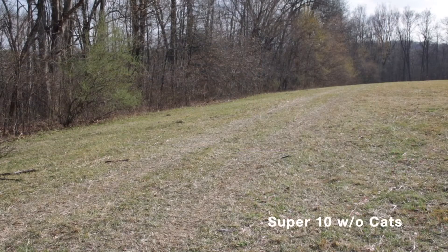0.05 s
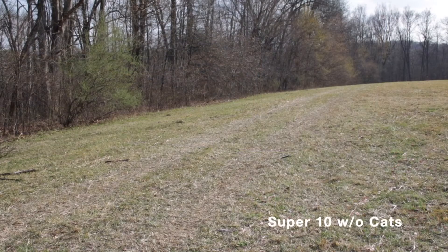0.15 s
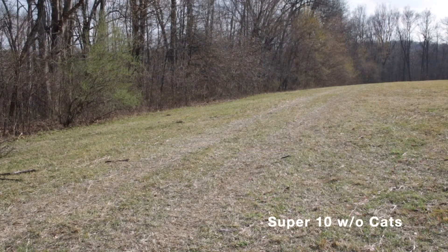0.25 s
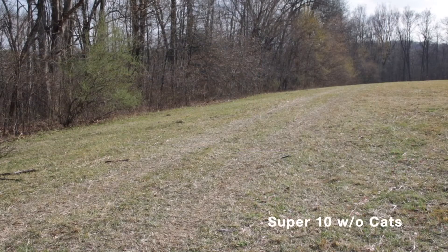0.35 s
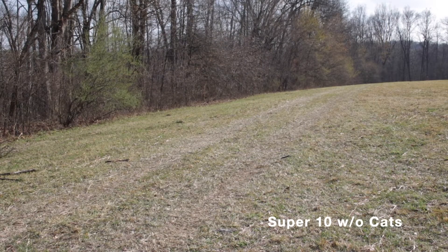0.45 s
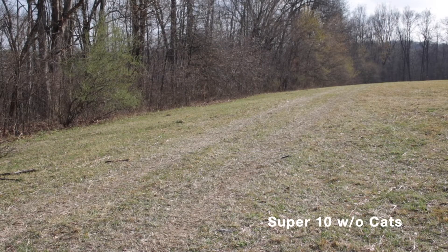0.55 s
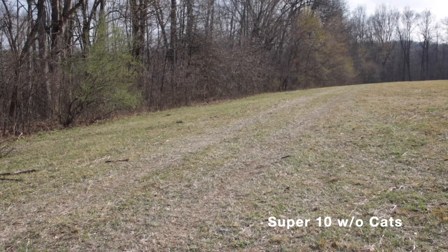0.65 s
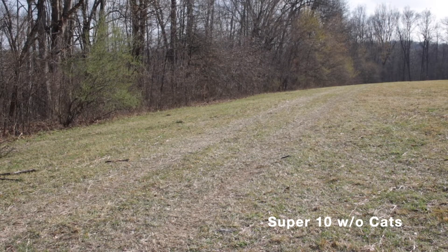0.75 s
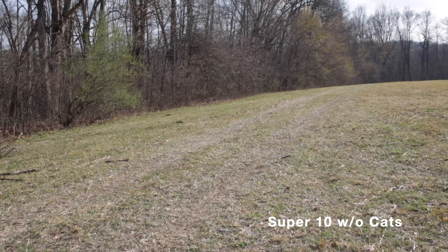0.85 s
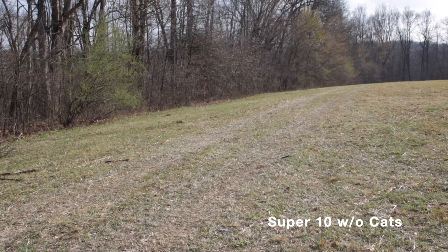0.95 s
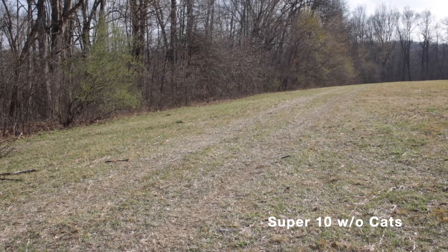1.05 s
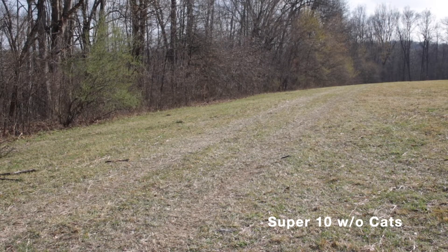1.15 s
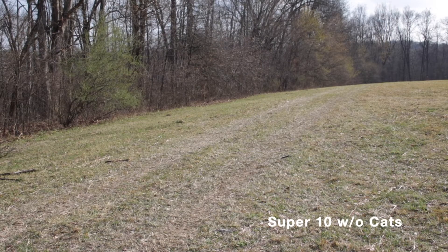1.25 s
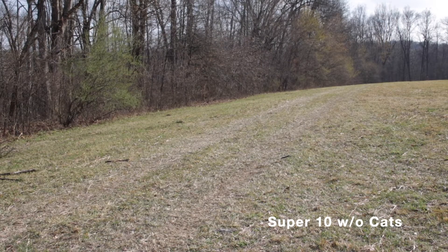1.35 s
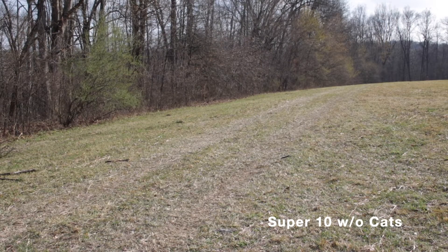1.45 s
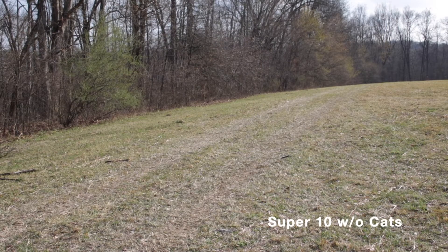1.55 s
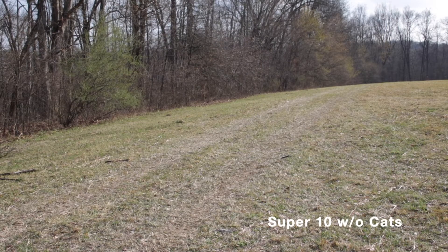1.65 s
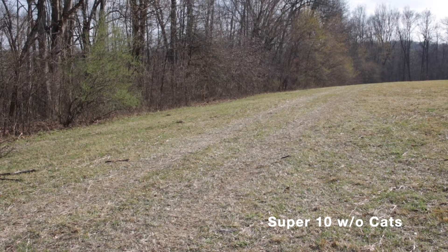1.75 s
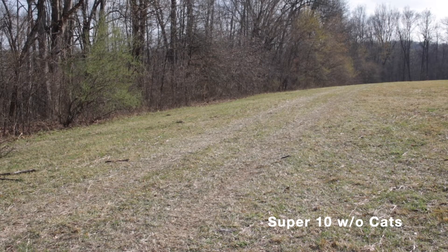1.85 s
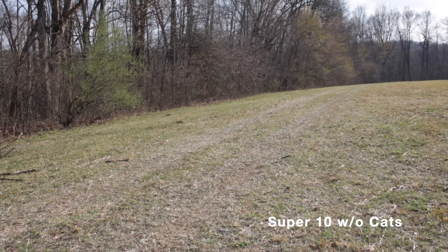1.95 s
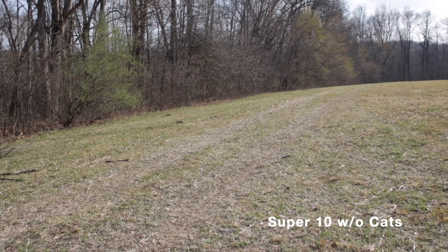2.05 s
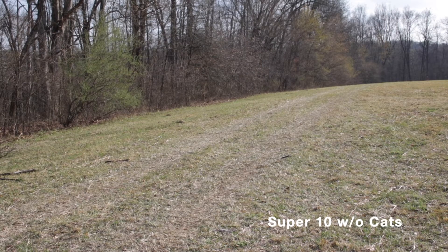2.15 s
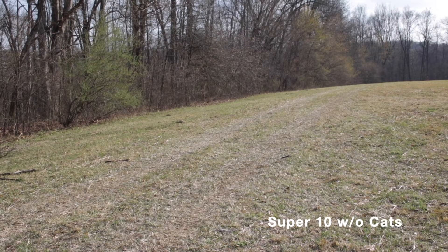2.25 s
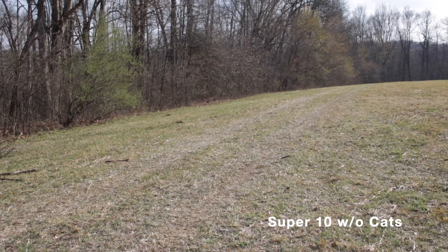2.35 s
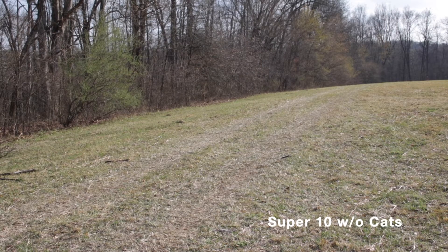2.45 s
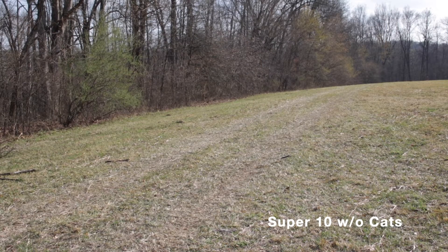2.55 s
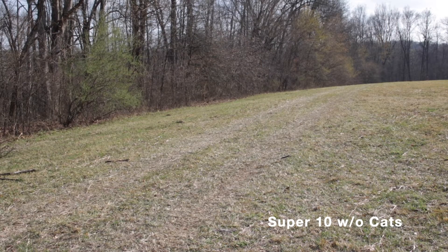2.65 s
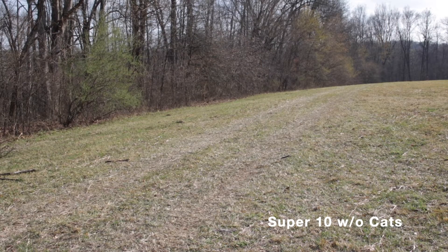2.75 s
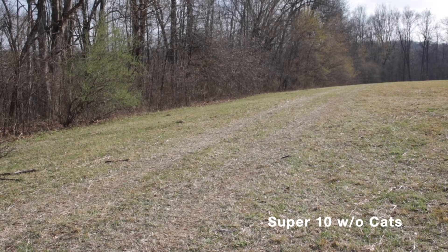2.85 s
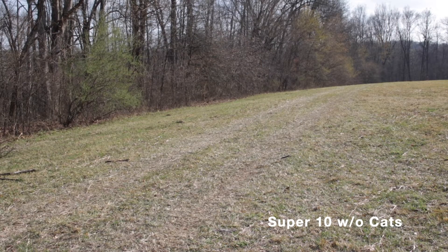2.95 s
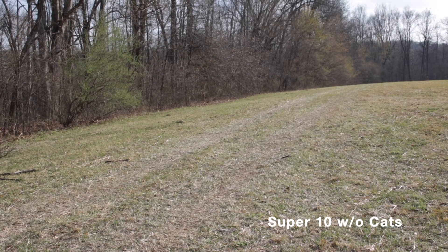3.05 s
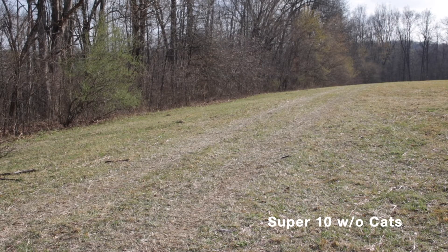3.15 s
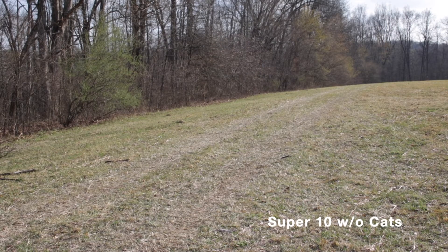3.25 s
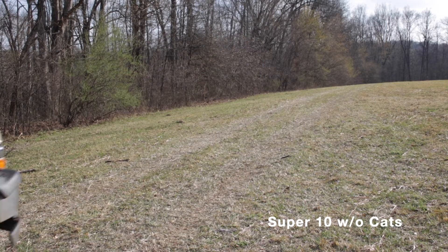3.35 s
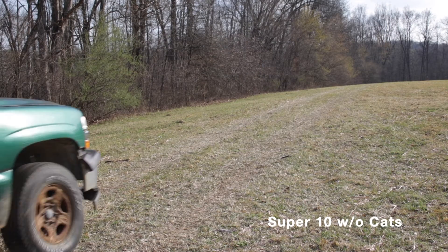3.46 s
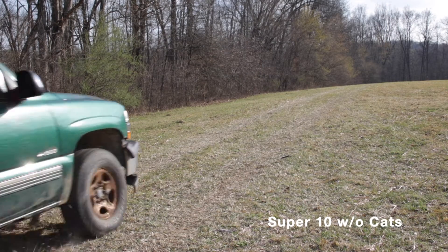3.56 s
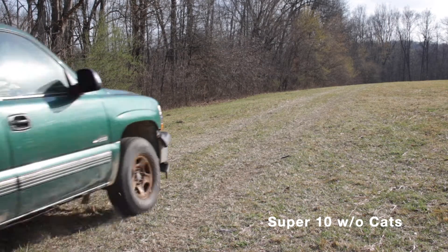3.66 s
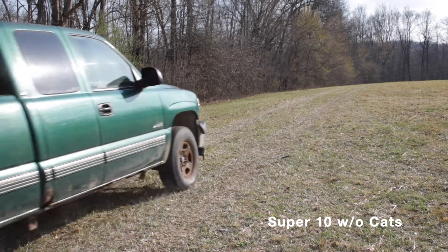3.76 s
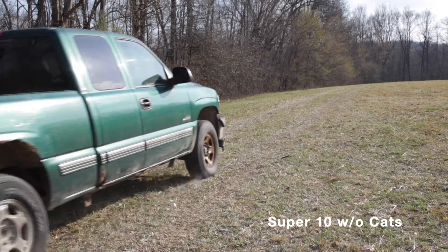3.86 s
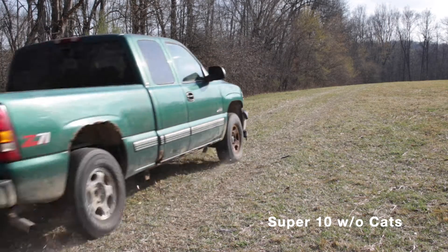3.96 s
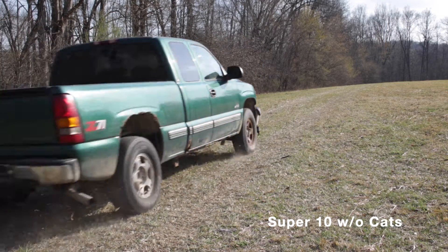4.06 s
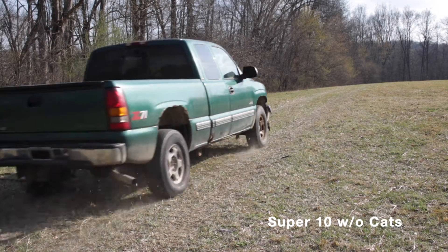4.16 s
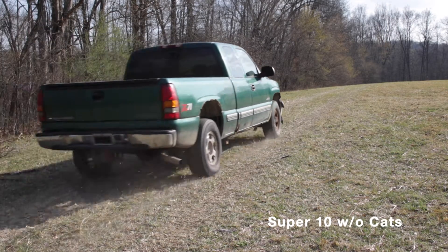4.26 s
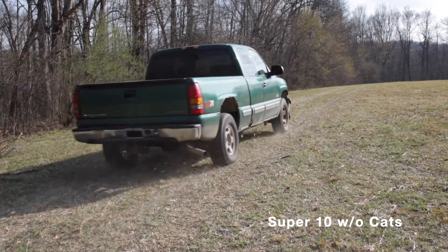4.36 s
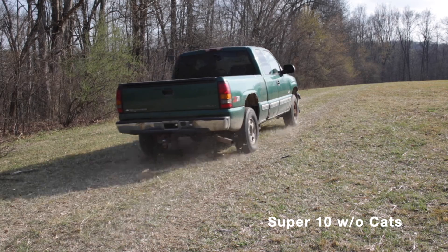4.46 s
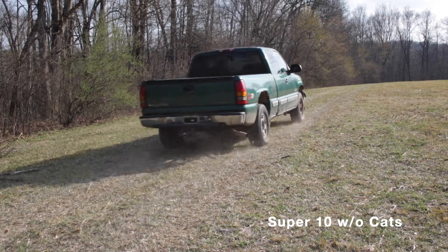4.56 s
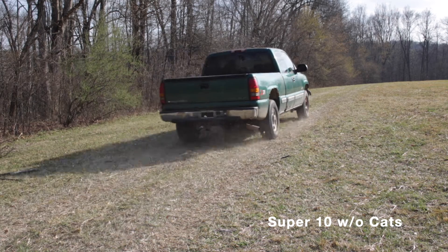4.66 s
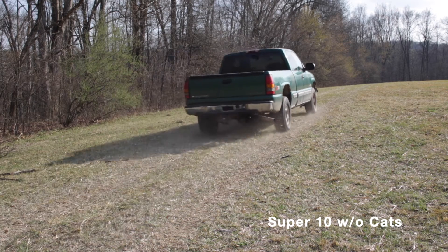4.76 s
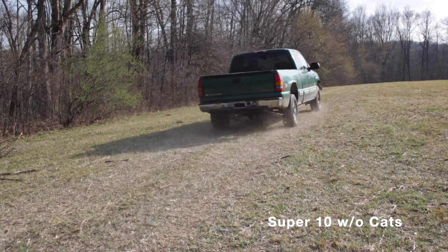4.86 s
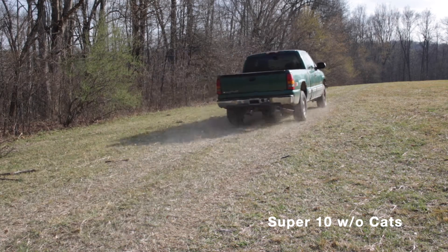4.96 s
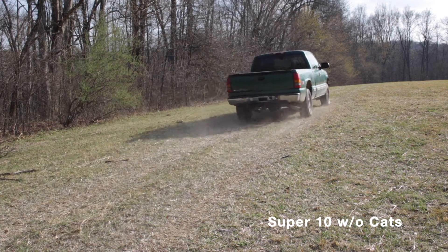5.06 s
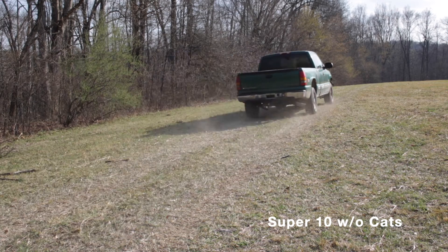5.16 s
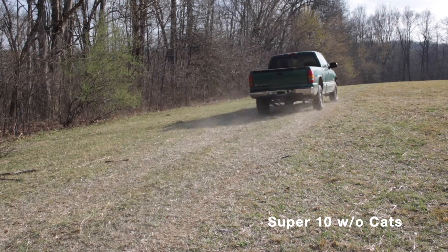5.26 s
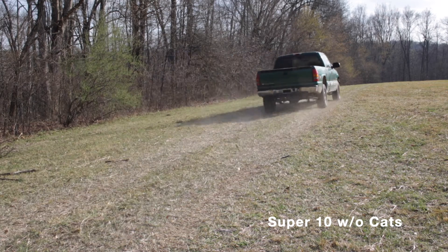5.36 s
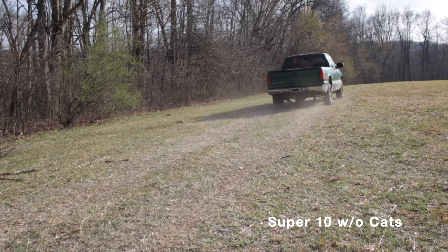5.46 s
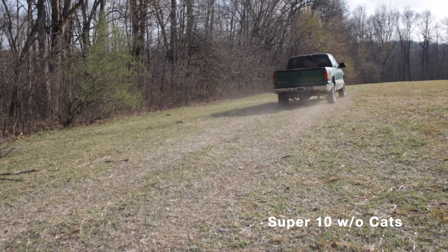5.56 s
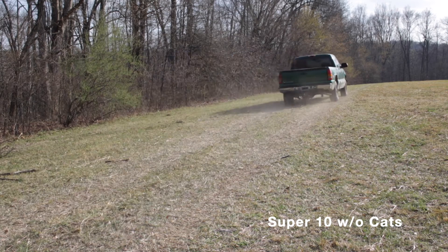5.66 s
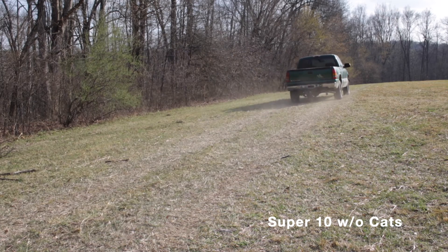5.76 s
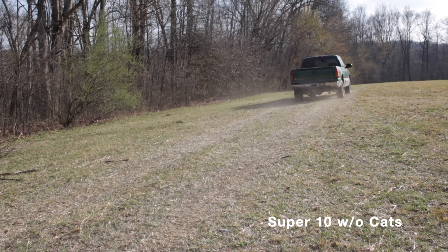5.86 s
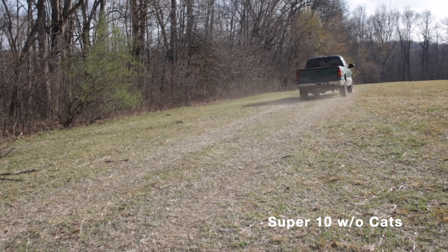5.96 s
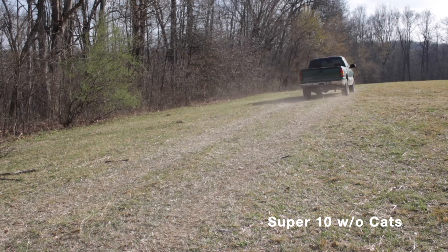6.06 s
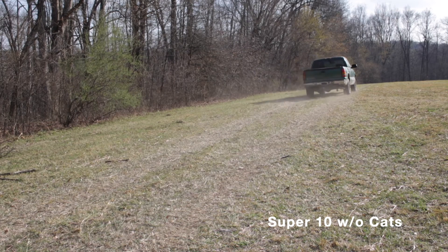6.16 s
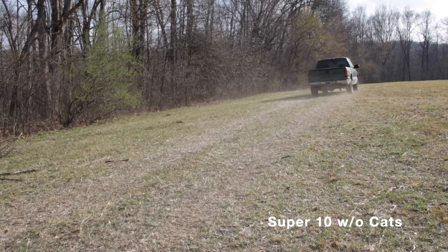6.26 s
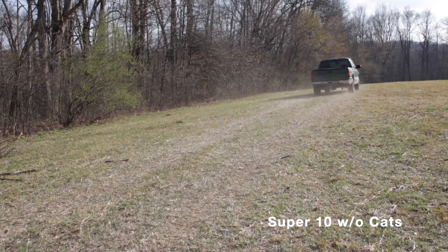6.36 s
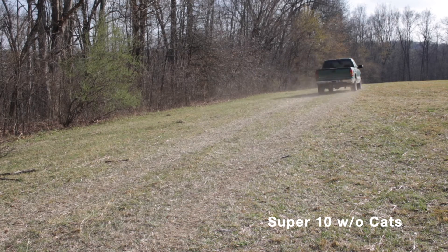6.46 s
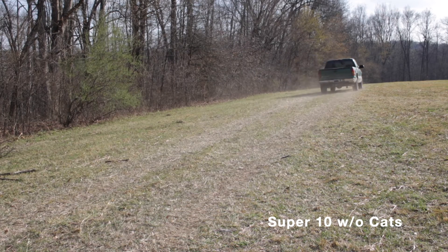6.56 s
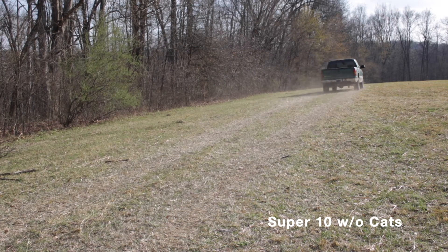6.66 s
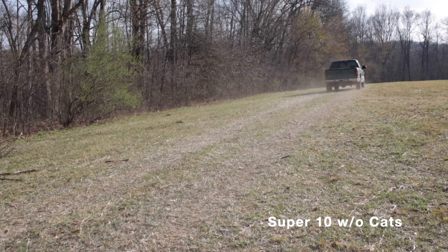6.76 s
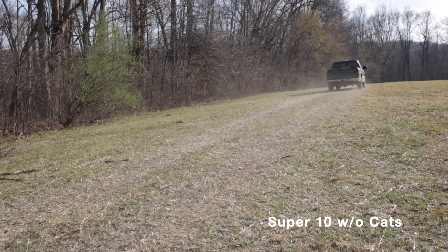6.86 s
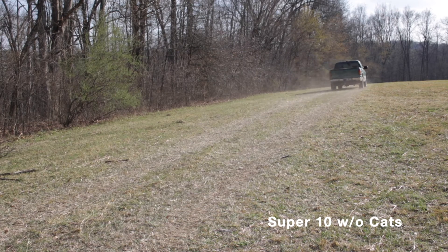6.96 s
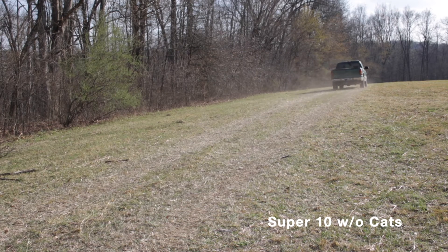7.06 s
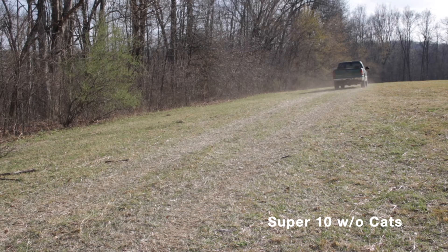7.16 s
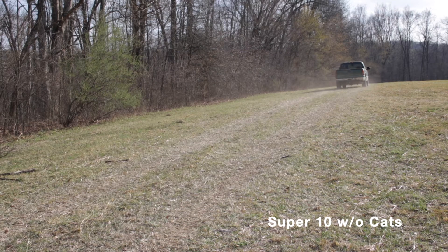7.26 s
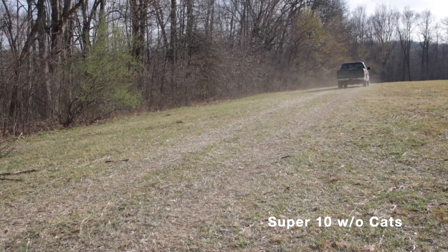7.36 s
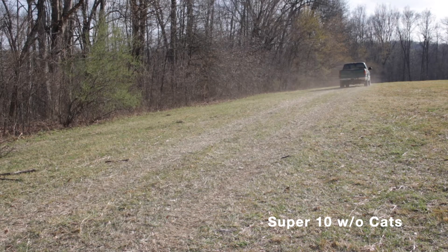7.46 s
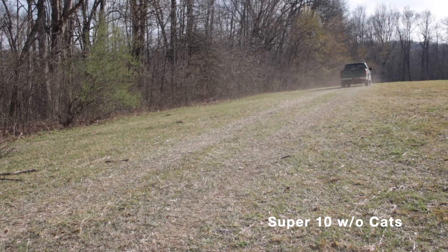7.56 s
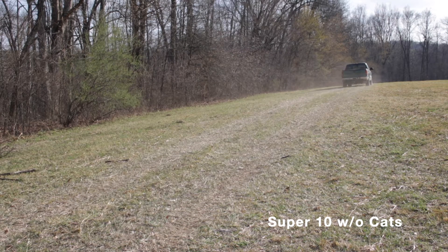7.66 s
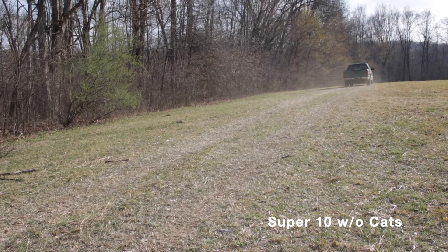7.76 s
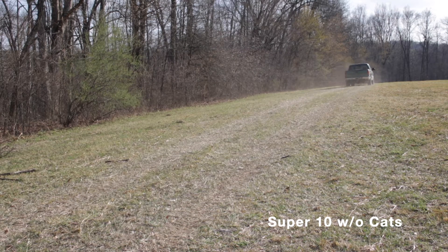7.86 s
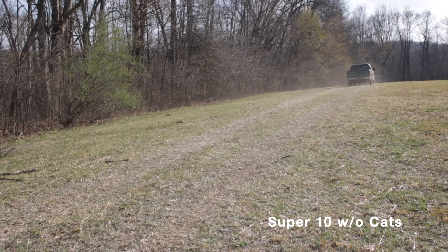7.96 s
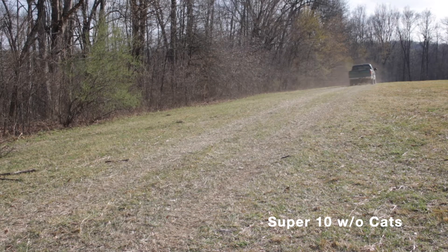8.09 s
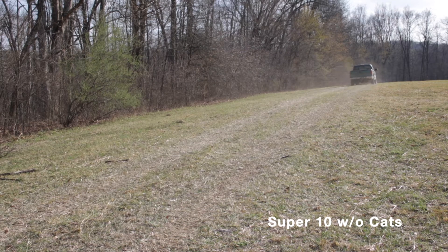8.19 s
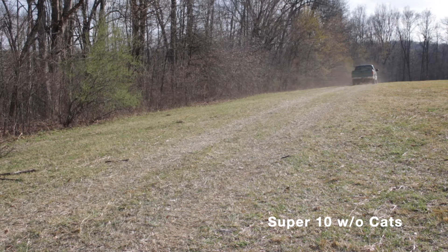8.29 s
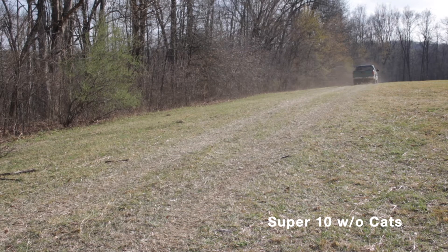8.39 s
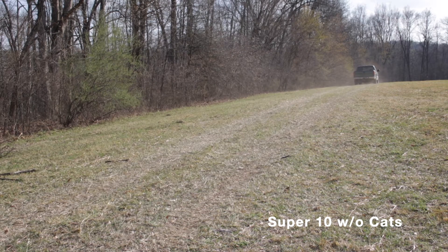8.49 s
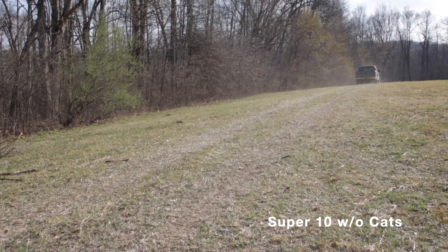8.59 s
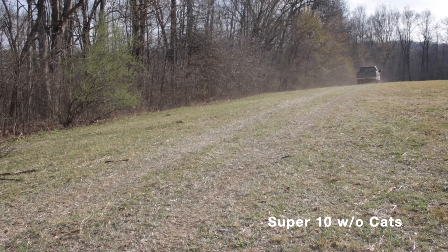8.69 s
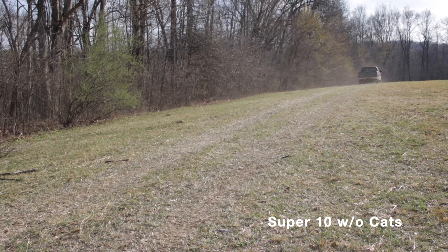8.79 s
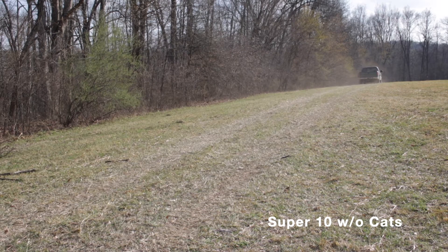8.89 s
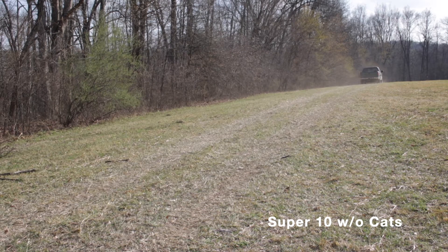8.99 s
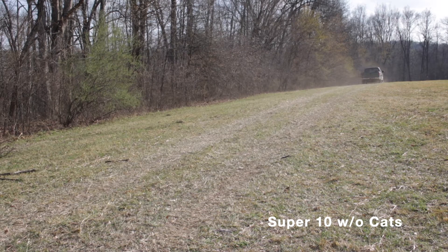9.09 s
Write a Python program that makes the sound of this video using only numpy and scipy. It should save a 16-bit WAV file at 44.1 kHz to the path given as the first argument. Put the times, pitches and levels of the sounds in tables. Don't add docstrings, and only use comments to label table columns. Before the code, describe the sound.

Outdoors in an open field, a fixed microphone hears quiet air and a very faint, uneven V8 throb for the first second. From 1 to 2 s the pickup nears from behind, with fan hiss and a brief, faint rising gear whine near 1.6 s. Around 2.5 s the throttle opens; a leaking joint snaps rapidly and the exhaust grows to a hard, raspy bark. Suspension thuds land at 3.2 and 3.5 s, with bed clanks and chattering panels. It passes closest about 3.7 to 3.9 s, loud enough to distort, with gassy outlet rush. More clanks follow at 4.1 to 5.2 s as the engine note drops steeply near 4.6 s. Very high brake chirps flutter between 4.7 and 5.7 s. The deep loping tailpipes pull again around 5.8 s, tyre hiss beneath, then recede with small rattles near 7.1 and 7.9 s, easing off and picking up slightly before ending at about 9 s.

```python
import sys
import numpy as np
from scipy import signal
from scipy.fft import rfft, irfft, next_fast_len
from scipy.io import wavfile
from scipy.ndimage import uniform_filter1d, map_coordinates

SR = 44100
rng = np.random.default_rng(int(sys.argv[2]) if len(sys.argv) > 2 else 0)


def gain_from_decibels(decibels):
    exponent = np.asarray(decibels, float) / 20
    return 10 ** exponent


def store_pcm(level_fs):
    pcm = np.round(np.clip(level_fs, -1, 1) * 32767).astype(np.int16)
    wavfile.write(sys.argv[1], SR, np.atleast_2d(pcm).T)


N = 402633
CYCLE = 8
TAIL_S, TAIL_TURN_S = 4.94, 0.35
PASS_S = 3.68


def unit(x):
    return x / np.sqrt(np.mean(x ** 2) + 1e-20)


def curves(rows, t):
    s, *cols = np.transpose(rows)
    return [np.interp(t, s, c) for c in cols]


def wobble(rate, t):
    knots = rng.standard_normal(int(N * rate / SR) + 4)
    return map_coordinates(knots, [t * rate])


def bump(t, at_s, width_s):
    return np.exp(-((t - at_s) / width_s) ** 2)


def turned(t, at_s, turn_s, ends):
    u = (t - at_s) / turn_s
    rear_share = (1 + u / np.sqrt(1 + u * u)) / 2
    return ends[0] + (ends[1] - ends[0]) * rear_share


def pipe(modes, f):
    rings = sum(gain_from_decibels(db) * c * w / (c * c - f * f + 1j * f * w) for c, w, db in modes)
    return rings * (1j * f / (1j * f + 95)) ** 3


def filtered(x, response):
    m = next_fast_len(N + 8192)
    spectrum = rfft(x, m) * response(np.fft.rfftfreq(m, 1 / SR))
    return unit(irfft(spectrum, m)[:N])


def coloured(x, points):
    f, db = np.transpose([(1, -120)] + list(points) + [(SR, -120)])
    return filtered(x, lambda hz: gain_from_decibels(np.interp(np.log(hz + 1), np.log(f), db)))


def grains(rate, spread_db):
    hits = rng.random(N) < rate / SR
    sizes = gain_from_decibels(spread_db * np.minimum(rng.exponential(size=N), 3.6))
    return hits * sizes * np.sign(rng.standard_normal(N))


def patchy(x, depth_db):
    z = signal.stft(x, nperseg=512)[2]
    drift = uniform_filter1d(rng.standard_normal(z.shape), size=5, axis=0)
    drift = uniform_filter1d(drift, size=24, axis=1)
    return signal.istft(z * gain_from_decibels(depth_db * unit(drift)), nperseg=512)[1][:N]


# frequency in Hz, level in dB per Hz.
FIELD_COLOUR = [(18, -45), (30, -37.5), (86, -1), (183, 4), (257, -8), (753, -22), (881, -24.5),
                (1030, -29), (1740, -40), (3180, -43), (4970, -20.5), (7560, -46.5), (15700, -50.5)]


def field_noise():
    return gain_from_decibels(-44) * coloured(rng.standard_normal(N), FIELD_COLOUR)


# time in seconds, firings per second in Hz.
ENGINE_SPEED = [(0, 90), (.5, 96.3), (1.4, 99.8), (1.9, 104.9), (2.2, 116.3), (2.5, 132), (2.95, 142.3),
                (3.35, 160.8), (3.55, 163), (3.8, 175.6), (4.1, 162.6), (4.27, 162.9), (4.74, 104),
                (5.8, 122.6), (7.6, 121.3), (7.97, 107.6), (8.55, 108), (9.13, 116.5)]


def firings(t):
    total = np.cumsum(curves(ENGINE_SPEED, t)[0]) * t[1]
    return total - np.interp(5.796, t, total) + 100 * CYCLE + 2


def flank_share(t):
    return np.clip(np.interp(t, (2.25, 2.44, 4.33, 4.16), [0.15, 0.82, 0.82, .03]), 0, 1)


# share in the near pipe from 0 to 1, pulse size, runner delay in ms.
CYLINDERS = [(1, 0.7, 0.073), (0.12, 0.53, 0.18), (0.64, 1.56, 0.22), (0.52, 1.87, 0.29),
             (0.02, 0.71, 0.047), (0.69, 1.15, 0.3), (0.22, 1.07, 0.076), (0.0042, 0.91, 0.16)]
# frequency in Hz, width in Hz, level in dB.
TAILPIPE_MODES = [(75.6, 4.1, -5), (129.5, 49, 3), (182.7, 25.3, 5), (283.7, 22.2, 2.5), (387.3, 27, 0.5),
                  (506.5, 72, -10), (651.3, 15.5, -10.5), (898, 50, -15.5), (1262, 34, -20)]
# frequency in Hz, width in Hz, level in dB.
FLANK_MODES = [(57.3, 30, -5.5), (109, 32, -10.5), (195.8, 5.8, 10.5), (237, 50, -6.5), (321.7, 38, -0.5),
               (445, 31, -7), (524, 70, -11), (689, 44, -13.5), (976, 190, -21)]
# time in seconds, level in dB.
EXHAUST_LEVEL = [(0, -53.5), (1.3, -43), (1.8, -36), (2.3, -31.5), (2.7, -18.5), (3.0, -14), (3.15, -18),
                 (3.35, -18), (3.88, -6.5), (4.3, -18), (4.8, -20.5), (5.3, -22.5), (5.8, -17.5),
                 (6.25, -20.5), (6.75, -21), (7.05, -23.5), (8.05, -23), (9.13, -28)]
# time in seconds, level in dB.
ENGINE_LOAD = [(0, -15.5), (2.2, -13.5), (2.45, -6.5), (3.0, -10.5), (3.6, -17.5), (4.1, -10.5), (4.6, -5),
               (5.6, -0.5), (6.8, -6), (7.8, -15.5), (9.13, -11.5)]
# firing rate in Hz, firing tone
# in dB, its octave in dB, lope (the orders below the firing tone) in dB.
MUFFLER = [(90, 2.5, -3, 7), (99.3, 7.5, 0.5, -15.5), (108, 7, -13, -10.5), (119, 3, -2.5, -8.5),
           (142.3, -2.5, -40, -16), (157, 2.5, 0.5, -5.5), (167, 4.5, -15, 1), (176, 0, -17, 0.9)]
# time in seconds, width in seconds, firing tone change in dB.
GEAR_SHIFTS = [
    (4.12, 0.033, -1.5),
    (4.55, 0.13, 8),
    (4.67, .025, -8),
    (6.27, 0.052, -3),
    (7.8, 0.083, -5),
]


def exhaust(count=98):
    knots = np.arange(0, N / SR + .02, .01)
    hz = curves(ENGINE_SPEED, knots)[0]
    bark_db = curves(EXHAUST_LEVEL, knots)[0]
    sharp_db = curves(ENGINE_LOAD, knots)[0]
    flank = flank_share(knots)
    tone_db, octave_db, lope_db = bark_db + curves(MUFFLER, hz)
    tone_db = tone_db + sum(db * bump(knots, s, width) for s, width, db in GEAR_SHIFTS)

    order = np.arange(1, count + 1)[:, None]
    f = order * hz / CYCLE
    far = -.9 / (1 + 1j * f / 700) ** 2
    pattern = 0
    for slot, (near, size, delay_ms) in enumerate(CYLINDERS):
        timing = np.exp(-2j * np.pi * (order * slot / CYCLE + f * delay_ms / 1000))
        pattern = pattern + size * (near + (1 - near) * far) * timing
    lines = pattern * ((1 - flank) * pipe(TAILPIPE_MODES, f) + flank * pipe(FLANK_MODES, f))
    lines *= gain_from_decibels(1.5 * np.array([wobble(2, knots) for _ in order]))
    lines *= gain_from_decibels(sharp_db / (1 + (480 / f) ** 4))
    lines *= np.exp(3j / (1 + (290 / f) ** 4) - 2.9j)

    lines[[CYCLE - 1, 2 * CYCLE - 1]] = 0
    for part, db in ((lines[:CYCLE], lope_db), (lines[CYCLE:], bark_db)):
        part *= gain_from_decibels(db) / np.sqrt(np.sum(abs(part) ** 2, axis=0))
    lines[CYCLE - 1] = -1j * gain_from_decibels(tone_db)
    lines[2 * CYCLE - 1] = -1j * gain_from_decibels(octave_db)

    step = 8
    t = np.arange(N // step + 1) * step / SR
    turn = np.exp(2j * np.pi * firings(t) / CYCLE)
    phasor, total = np.ones(len(t), complex), np.zeros(len(t))
    for line in lines:
        phasor = phasor * turn
        total += (np.interp(t, knots, line) * phasor).real
    return np.sqrt(2) * signal.resample_poly(total, step, 1)[:N]


def puffs(t):
    firing = firings(t)
    index = firing.astype(int)
    sizes = np.array([gain_from_decibels(1.9 * near) * size ** 1.46 for near, size, _ in CYLINDERS])
    scatter = gain_from_decibels(2.2 * rng.standard_normal(int(firing[-1]) + 1))
    push = gain_from_decibels(0.54 * curves(ENGINE_LOAD, t)[0])
    return 0.93 + push * sizes[index % CYCLE] * scatter[index] * np.exp(-3 * (firing % 1))


# time in seconds, level in dB.
BODY_SHAKE = [(0, -69), (1.98, -59.5), (2.64, -45), (3.1, -34.5), (3.25, -32), (3.57, -21), (3.89, -18),
              (4.04, -30), (4.3, -33.5), (4.6, -40), (5.42, -39), (5.59, -35), (6.08, -42), (6.94, -47),
              (7.4, -47), (7.95, -40.5), (8.39, -43.5), (9.13, -45.5)]
# frequency in Hz, level in dB per Hz.
RASP_COLOUR = [(320, -34.5), (550, -2), (667, -8), (706, -9.5), (808, -2.5), (911, -4), (1110, -8),
               (1300, -11.5), (1410, -21.5), (1600, -11), (2080, -47.5), (3520, -120)]
# frequency in Hz, level in dB per Hz.
OUTLET_COLOUR = [(600, -34), (850, -8), (1050, 7), (1350, 4.5), (2000, -25)]


def turbulence(t, puff):
    flank, exhaust_db = flank_share(t), curves(EXHAUST_LEVEL, t)[0]
    rough_db = turned(t, TAIL_S, TAIL_TURN_S, (-10.5, -15.5))
    body_share = 0.7
    rasp_db = -1.5 + body_share * curves(BODY_SHAKE, t)[0] + (1 - body_share) * exhaust_db
    rasp_db = rasp_db + turned(t, TAIL_S, TAIL_TURN_S, (0, -3))

    behind = filtered(puff * rng.standard_normal(N), lambda f: pipe(TAILPIPE_MODES, f))
    side = filtered(puff * rng.standard_normal(N), lambda f: pipe(FLANK_MODES, f))
    rumble = gain_from_decibels(exhaust_db + rough_db + 7.0) * ((1 - flank) * behind + flank * side)
    outlet = coloured(puff ** 0.96 * rng.standard_normal(N), OUTLET_COLOUR)
    outlet = gain_from_decibels(-14.5) * bump(t, PASS_S, .22) * outlet
    rasp = patchy(coloured(puff ** 1.12 * rng.standard_normal(N), RASP_COLOUR), depth_db=3.54)
    return rumble + outlet + gain_from_decibels(rasp_db) * rasp


# frequency in Hz, level in dB per Hz.
RATTLE_COLOUR = [(1120, -44), (1900, -3.5), (3060, 3.5), (3270, 3), (4500, -0.5), (5000, -30), (6760, -50),
                 (11400, -120)]
# frequency in Hz, level in dB per Hz.
FAN_COLOUR = [(820, -20), (1400, -3.5), (1750, -2), (2540, -10.5), (3890, -24.5), (4670, -5.5), (5490, -11),
              (6460, -17), (9780, -25), (15700, -45.5)]
# frequency in Hz, level in dB per Hz.
TYRE_COLOUR = [(2760, -4), (4700, -1), (5010, -22.5), (5570, -13.5), (6050, -7), (6730, -7.5), (10300, -19),
               (11500, -29.5), (15000, -40)]
# frequency in Hz, level in dB per Hz.
BAY_COLOUR = [(1100, -24.5), (1450, -14), (1750, 2.5), (2050, -11), (2400, -9.5), (3200, -10)]
# start in seconds, peak in dB, bright crack in dB compared with the peak.
BED_CLANKS = [(3.063, -12.5, -20), (3.2754, -11, -21), (4.0698, -7.5, -21), (4.2667, -4.5, -39),
              (4.3917, -12.5, -31), (4.808, -8, -35), (4.9135, -14.5, -26), (4.938, -15, -38),
              (5.245, -18, -28), (5.461, -33, -24), (7.0189, -30.5, -12), (7.081, -35, -16.5),
              (7.1314, -23, -1.5), (7.585, -27, -24), (7.9174, -22, -8.5), (8.001, -25.5, -20.5)]


def chassis(t, puff):
    rattle_db = curves(BODY_SHAKE, t)[0]
    hiss_db = rattle_db + turned(t, 3.54, .6, (4.5, -13))
    hiss_db = hiss_db + 0.23 * (curves(ENGINE_LOAD, t)[0] + 8)
    jolts, jolt_decay_s = np.zeros(N), .03
    for s, db, _ in BED_CLANKS:
        jolts[round(s * SR)] = gain_from_decibels(db - 19)
    jolts = signal.lfilter([1], [1, -np.exp(-1 / (jolt_decay_s * SR))], jolts)
    shake = gain_from_decibels(rattle_db + turned(t, TAIL_S - .3, TAIL_TURN_S, (6, -8.5))) + jolts

    clumps = gain_from_decibels(1.35 * wobble(30, t) + 1.2 * wobble(5.3, t)) * puff ** 0.75
    chatter = rng.standard_normal(N) + 0.75 * unit(grains(900, spread_db=4.0))
    rattle = coloured(clumps * chatter, RATTLE_COLOUR)
    air = rng.standard_normal(N) + 0.61 * unit(grains(400, spread_db=5.0))
    fan = coloured(gain_from_decibels(0.69 * wobble(20, t)) * air, FAN_COLOUR)
    grit = rng.standard_normal(N) + .6 * unit(grains(250, spread_db=3.0))
    tyres = coloured(clumps * grit, TYRE_COLOUR)
    behind = np.clip((t - 3.85) / 0.12, 0, 1)
    hiss = gain_from_decibels(2.0) * (1 - behind) * fan + behind * tyres
    drone = coloured(clumps * rng.standard_normal(N), BAY_COLOUR)
    mix = gain_from_decibels(-5.5) * shake * drone + gain_from_decibels(rattle_db - 0.4) * rattle + gain_from_decibels(hiss_db + 2.94) * hiss
    return patchy(mix, depth_db=1.5)


def grounded(x, t):
    delay_ms, fall_s, strength = 0.877, 0.31, 0.39
    near = 1 / np.sqrt(1 + ((t - PASS_S) / fall_s) ** 2)
    bounce = np.interp(t - delay_ms / 1000 * near, t, x)
    return x + strength * (2 * near - 1).clip(0) * bounce


# time in seconds, frequency in Hz, level in dB.
GEAR_WHINE = [
    (1.2, 1062, -66),
    (1.6, 1098, -51),
    (1.95, 1140, -70),
]


def whine(t):
    hz, db = curves(GEAR_WHINE, t)
    heard = (t > GEAR_WHINE[0][0]) & (t < GEAR_WHINE[-1][0])
    tone = np.sin(2 * np.pi * np.cumsum(hz) / SR)
    return heard * gain_from_decibels(db + 1.1 * wobble(8.4, t)) * tone


def decay(t, t60_s, rise_s):
    return gain_from_decibels(-60 * t / t60_s) * (1 - np.exp(-t / rise_s))


# frequency in Hz, level in dB per Hz.
LEAK_COLOUR = [(900, -18), (1400, -2.5), (1750, 3.5), (2300, -2), (3000, -7.5), (3600, -28)]


def leak(t, count=6):
    gate, s = np.zeros(N), 2.470
    snap = decay(t[:900], .03, .0008)
    for _ in range(count):
        gap = 1 / curves(ENGINE_SPEED, s)[0]
        gate[round(s * SR):][:900] += snap
        gate[round((s + 3 * gap) * SR):][:900] += gain_from_decibels(-8.5) * snap
        s += CYCLE * gap
    swell = 0.26 + 0.46 * bump(t, 2.63, 0.16)
    return gain_from_decibels(-17.5) * swell * gate * coloured(rng.standard_normal(N), LEAK_COLOUR)


# frequency in Hz, width in Hz, level in dB.
BED_MODES = [(1440, 170, -0.5), (1603, 31, 8.5), (1812, 85, -2), (2840, 420, -9), (3530, 160, -14.5),
             (6760, 1100, -27)]


def clanks():
    cracks, blows, t = np.zeros(N), np.zeros(N), np.arange(SR // 4) / SR
    for s, db, crack_db in BED_CLANKS:
        start = round(s * SR)
        blows[start:][:len(t)] += gain_from_decibels(db) * decay(t, 0.053, 0.00061) * np.sign(rng.standard_normal(len(t)))
        blows[start] += 2.9 * gain_from_decibels(db)
        bright = uniform_filter1d(np.diff(rng.standard_normal(len(t) + 1)), size=8)
        cracks[start:][:len(t)] += gain_from_decibels(db + crack_db - 9.0) * decay(t, .05, .0005) * bright
    ring = filtered(blows, lambda f: pipe(BED_MODES, f))
    return cracks + gain_from_decibels(-7.5) * np.std(blows) * ring


# start in seconds, peak in dB, frequency in Hz, time to fall 60 dB in seconds.
SUSPENSION_THUDS = [
    (3.176, -5.5, 411, 0.15),
    (3.183, -5.5, 546, 0.083),
    (3.19, -10, 817, 0.05),
    (3.465, -4.5, 424.4, 0.26),
]


def thuds():
    out, t = np.zeros(N), np.arange(SR // 4) / SR
    for s, db, hz, t60_s in SUSPENSION_THUDS:
        out[round(s * SR):][:len(t)] += gain_from_decibels(db) * decay(t, t60_s, 0.0015) * np.sin(2 * np.pi * hz * t)
    return out


# start in seconds, length in seconds, level in dB.
BRAKE_CHIRPS = [
    (4.19, 0.046, -72),
    (4.332, .08, -71),
    (4.498, .12, -73.5),
    (4.745, 0.042, -54),
    (4.897, 0.13, -51),
    (4.986, 0.099, -54),
    (5.146, 0.036, -69),
    (5.538, 0.042, -54),
    (5.667, 0.043, -60.5),
]


def chirps():
    out, t = np.zeros(N), np.arange(SR // 4) / SR
    for s, length_s, db in BRAKE_CHIRPS:
        flutter = 1 + .6 * np.sin(2 * np.pi * 45 * t)
        tone = np.sin(2 * np.pi * 15650 * t + np.cumsum(rng.normal(0, .06, len(t))))
        out[round(s * SR):][:len(t)] += gain_from_decibels(db) * decay(t, 3 * length_s, .004) * flutter * tone
    return out


def scene():
    t = np.arange(N) / SR
    puff = puffs(t)
    engine = exhaust() + turbulence(t, puff) + whine(t) + leak(t)
    body = grounded(chassis(t, puff), t) + clanks() + thuds() + chirps()
    return (field_noise() + engine + body)[None]


def top_cut(x):
    return signal.sosfilt(signal.butter(12, 15890, fs=SR, output="sos"), x)


def record(dry):
    ceiling = .81
    dry = dry + gain_from_decibels(-65.5) * rng.standard_normal(N)
    clipped = dry / (1 + abs(dry / ceiling) ** 12) ** (1 / 12)
    return top_cut(clipped)


dry = scene()
out = record(dry)
store_pcm(out)
```